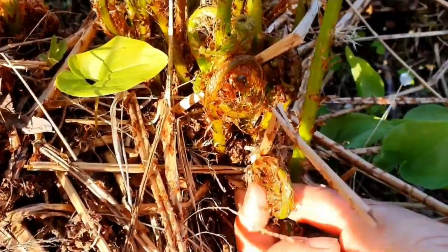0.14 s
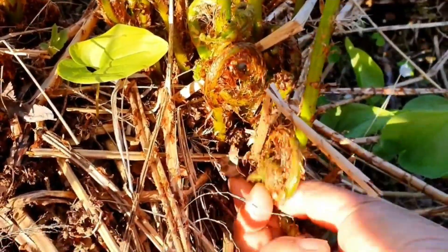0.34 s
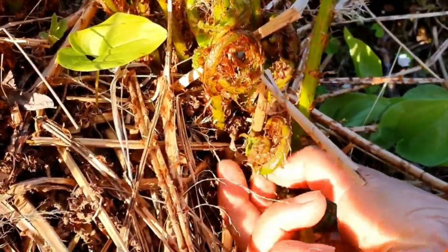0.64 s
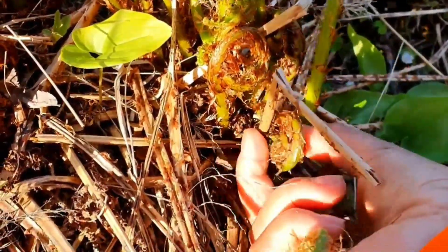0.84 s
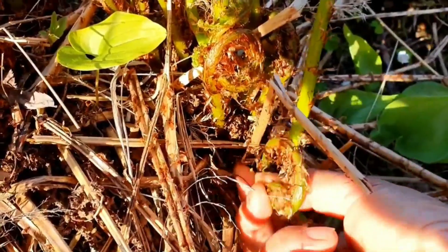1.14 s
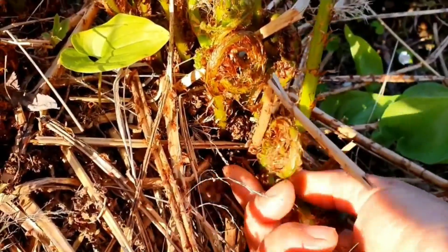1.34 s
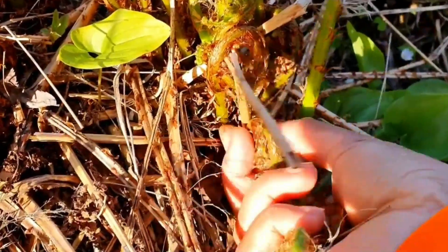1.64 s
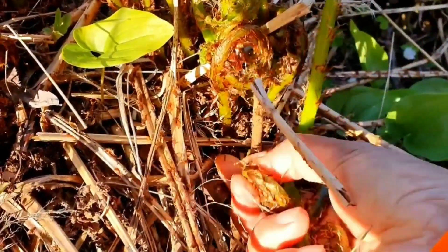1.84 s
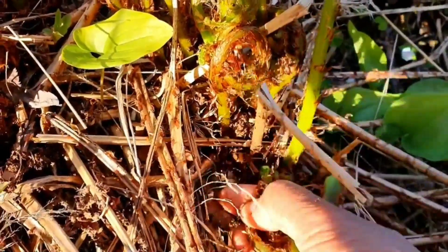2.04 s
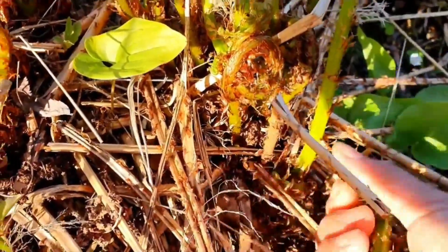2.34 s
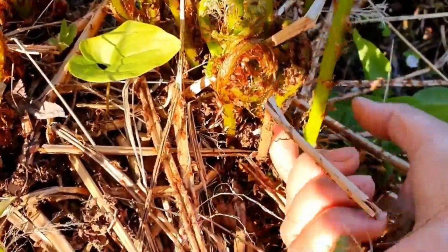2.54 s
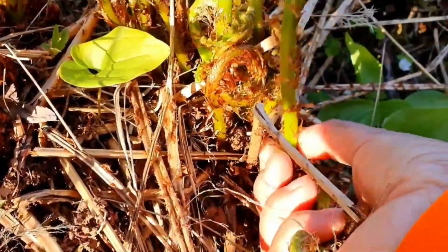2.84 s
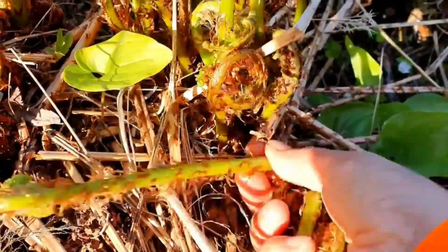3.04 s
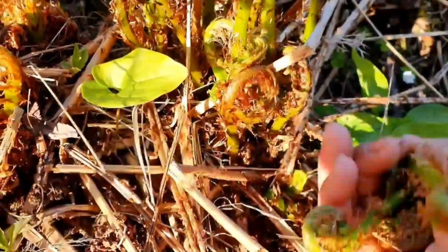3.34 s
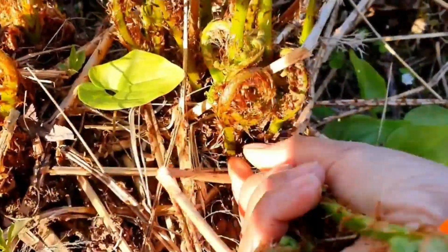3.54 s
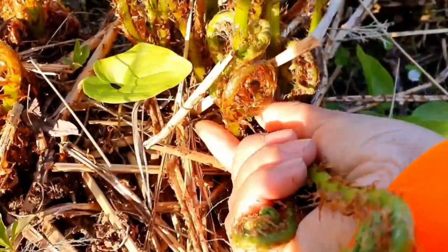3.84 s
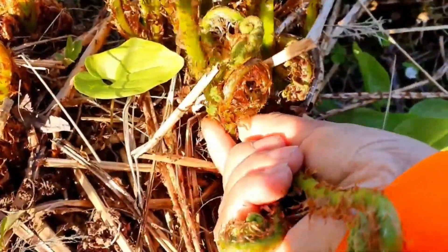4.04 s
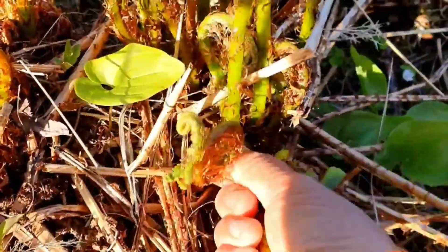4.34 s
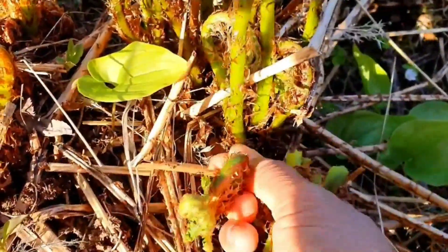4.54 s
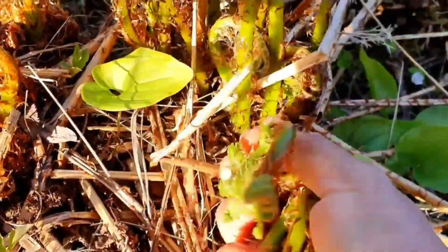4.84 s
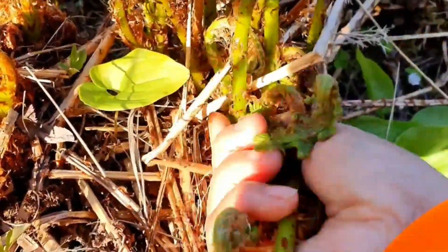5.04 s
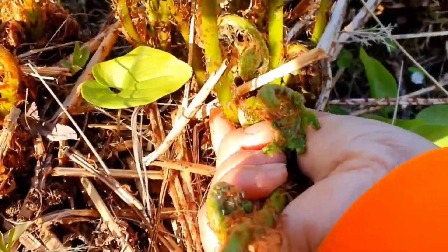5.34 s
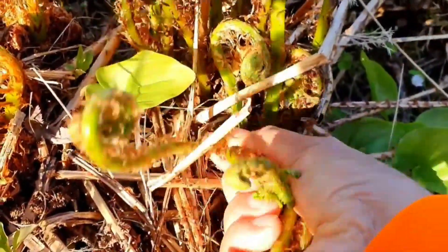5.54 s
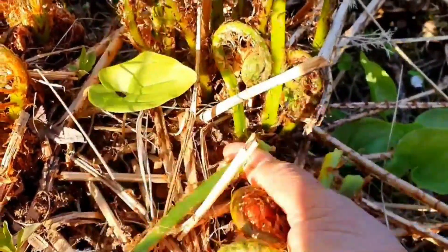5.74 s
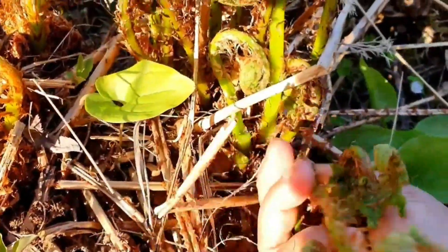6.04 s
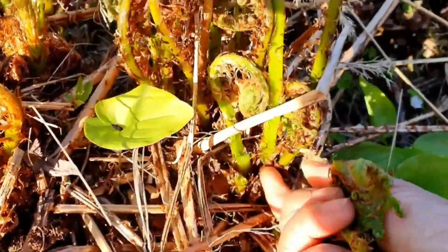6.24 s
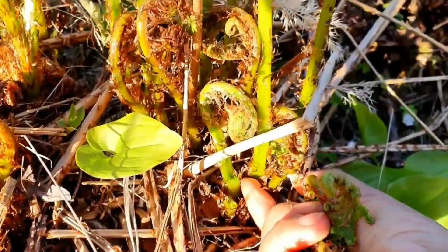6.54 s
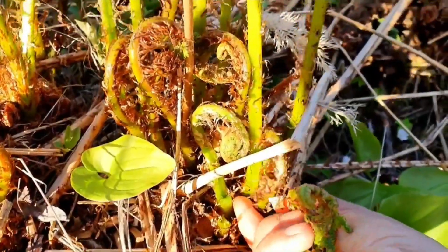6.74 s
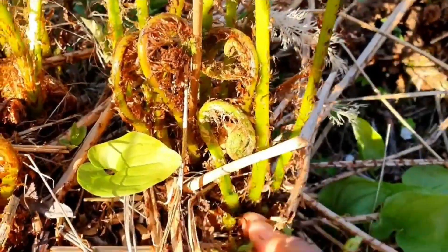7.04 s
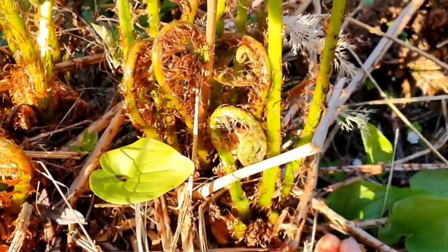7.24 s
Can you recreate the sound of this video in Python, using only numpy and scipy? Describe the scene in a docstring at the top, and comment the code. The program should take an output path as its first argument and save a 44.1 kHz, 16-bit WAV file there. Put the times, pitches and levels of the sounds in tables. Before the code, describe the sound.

Dry leaflets crackle and fizz in short irregular sweeps as a hand picks young ferns. Brittle stems tick and crack around five juicy snaps, each a sharp click with a short splintering tear. Small low bumps stir the root crown, one clearly stronger late on. The sound is close, dry and detailed, with almost no echo, above a faint distant engine and soft low air rumble.

```python
"""Dead fronds rustle and dry stalks crack from the start, as a hand works close to two microphones.
Then five juicy fern shoots snap off one by one: pulses and noise tails through knock, ring and splinter bands.
Bumps and each snap's recoil rock the root crown, a bank of dying sines; the hardest bump comes past 4.9 s.
Below it all a far two-harmonic engine hum first eases, then slowly picks up speed and steadies,
over quiet outdoor rumble made of filtered noise."""
import sys
import numpy as np
from scipy import signal
from scipy.fft import rfft, irfft, next_fast_len
from scipy.io import wavfile
from scipy.ndimage import uniform_filter1d, map_coordinates

SR = 44100
rng = np.random.default_rng(int(sys.argv[2]) if len(sys.argv) > 2 else 0)


def store_pcm(level_fs):
    """Save levels as 16-bit WAV."""
    pcm = np.round(np.clip(level_fs, -1, 1) * 32767).astype(np.int16)
    wavfile.write(sys.argv[1], SR, np.atleast_2d(pcm).T)


N = 326508

# juicy shoots breaking, levels ahead of the layer gain: [start_s, knock_db, ring_db, splinter_db,
# knock_hz, ring_hz, left_lag_ms, left_over_right_db]
SHOOT_SNAPS = [(2.2023, -25, -16, -23, 1820, 7000, 0.11, -2.5),
               (3.2946, -35.5, -22, -23, 1184, 4290, 0.16, -3),
               (4.687, -30, -24.5, -24, 1730, 3670, 0.096, -0.5),
               (5.89, -32.5, -25.5, -29.5, 1800, 2980, 0.117, 0.5),
               (7.178, -29.5, -23, -24.5, 2000, 3680, 0.12, -5.5)]
# dry stalks cracking, level ahead of the layer gain: [start_s, ring_db, thickness_0_to_1, ring_hz,
# left_over_right_db]
STALK_CRACKS = [(0.126, -42.5, 0.2, 4160, 0), (0.2701, -33, 0.08, 3640, -6.5),
                (0.3077, -33, 0.75, 3420, -1.5), (0.5008, -38.5, 0.6, 5430, -1),
                (0.614, -40.5, 0.4, 6370, -7), (0.6789, -30.5, 0.41, 6560, -6), (0.947, -35, 0.34, 4000, 4),
                (1.1343, -35.5, 0.62, 3920, -10), (1.8311, -36.5, 0.67, 3400, -1),
                (1.846, -26, 0.1, 7000, -1), (1.8624, -39, 0.4, 6200, -8), (1.8798, -34, 0, 6950, -3),
                (1.9286, -30.5, 0.6, 6120, -9), (1.9348, -31.5, 0.81, 2750, -4.5),
                (1.975, -26, 0.78, 4930, -6), (2.0522, -30, 0.4, 3640, -28), (2.0663, -35.5, .3, 3770, 12),
                (2.1267, -33, 0.56, 3760, -4), (2.2441, -31.5, .95, 3040, -0.5),
                (2.421, -39.5, 0.96, 6710, -1), (2.4459, -33, 0.82, 3750, -1.5),
                (2.8246, -41, 0.57, 4630, -18), (3.0775, -49, 0, 6900, -6), (3.319, -34, 0.1, 3100, -1),
                (3.3365, -38.5, 0.1, 3944, -3), (3.486, -35, 0.25, 3830, -2),
                (3.4904, -30.5, 0.43, 4760, -3.5), (4.0588, -39.5, 0.5, 5470, -5),
                (4.1793, -45, 0.2, 5250, 7), (4.2964, -37.5, 0.52, 4460, -3), (4.3805, -45, .05, 3570, 0),
                (4.4359, -43, .05, 5640, 2), (4.4569, -38, 0, 6900, 0), (4.5223, -34, 0.4, 6300, -2),
                (4.5727, -38, 0.35, 4260, -3), (4.8034, -28, 0.76, 3800, -1.5),
                (4.9549, -28, 0.23, 3650, 1.5), (4.9848, -28, 1, 6330, 0), (6.0942, -42, 0.78, 4100, 0),
                (6.2568, -41.5, .7, 4170, 2), (6.6003, -44.5, 0, 5060, -3), (6.7246, -47, 0.14, 4780, -4),
                (6.9566, -40.5, 0.36, 6270, -7), (7.1857, -35, 1, 3780, 2), (7.2168, -35, 0.99, 2830, 0)]
# the hand bumps the crown and soil: [start_s, strength_db over the crown modes, contact_cutoff_hz]
CROWN_BUMPS = [(0.679, -48.5, 119), (1.465, -48.5, 70), (1.976, -47, 900), (2.242, -43, 900),
               (2.448, -43, 500), (3.321, -48.5, 500), (4.985, -27, 130), (6.098, -41.5, 1295),
               (7.059, -48.5, 70), (7.217, -42.5, 600)]
# far engine, around which the pitch wavers: [time_s, firing_hz]
ENGINE_SPEED = [(0.0, 38.58), (0.65, 36.85), (2.43, 36.53), (3.0, 38.0), (3.42, 39.8), (4.12, 41.74),
                (5.26, 42.7), (5.5, 42.5), (6.11, 42.2), (7.05, 42.2)]
# relative spectra of stalk scrape, leaflet rustle, papery fizz and outdoor rumble: [freq_hz, level_db]
STALK_SPECTRUM = [(100, -16), (220, -6), (450, -9.5), (1000, -8.5), (1500, -2), (2000, -2), (2600, -4.5),
                  (4000, -28)]
FROND_SPECTRUM = [(1200, -57), (2100, -10), (2800, -0.5), (3800, 0.5), (5200, -2), (6700, -2), (8000, -11),
                  (11000, -39)]
PAPER_SPECTRUM = [(5000, -19), (7000, -10.5), (8200, -3), (9800, 0), (12500, -1), (15000, -0.5),
                  (15600, -5), (16000, -41)]
AIR_SPECTRUM = [(15, -24), (35, -7.5), (70, 7.5), (110, -3.5), (170, -11.5), (300, -21.5), (700, -36.5),
                (2000, -36), (15000, -40), (16500, -56)]
# how alike the two microphones hear the rustle: [freq_hz, likeness_0_to_1]
RUSTLE_LIKENESS = [(200, 0.4), (1000, 0.51), (2500, 0.11), (6000, 0.039), (15000, 0.12)]
# scatter dying away in the undergrowth: [freq_hz, t60_s]
LITTER_DECAY = [(200, 0.24), (2000, 0.024), (12000, 0.014)]
# the root crown rocking in the soil, and its woody stubs, before random scatter: [mode_hz, level_db, t60_s]
CROWN_MODES = [(74.7, -2, 0.18), (106.6, -5.5, 0.13), (153, -1, 0.076), (240, -9, 0.061),
               (340, -20.5, 0.023), (580, -1.5, 0.029), (720, 4, 0.016), (900, -7, 0.011),
               (1180, 10, 0.018), (1640, 3.5, 0.027)]
# light, unbroken touch of the dead fronds, ahead of the layer gains: [time_s, rustle_db]
LIGHT_CONTACT = [(0, -58.5), (.5, -54.5), (.84, -60.5), (1, -56.5), (1.45, -68), (1.74, -66.5),
                 (1.9, -51.5), (2.65, -55), (3.18, -64), (3.42, -59.5), (3.68, -61.5), (3.85, -53.5),
                 (4.22, -55), (5.3, -53.5), (5.7, -60.5), (6.15, -51), (6.82, -61.5), (7.4, -49)]
# fronds swept aside, ahead of the layer gains: [peak_s, length_s, rustle_db, scrape_over_rustle_db,
# fizz_over_rustle_db]
FROND_SWEEPS = [(0.143, 0.18, -53.5, -7.5, 1.5), (0.306, 0.028, -48.5, -4, -8), (0.394, .13, -48, -8, -2),
                (0.497, 0.065, -49.5, -9, -2), (0.543, 0.037, -52, 0, -1), (0.681, 0.062, -47, -8.5, -1),
                (0.899, 0.065, -48.5, -11, -2.5), (1.097, 0.083, -54, -7, -5), (1.255, 0.1, -58.5, -3, -8),
                (1.361, 0.36, -56, -10.5, 0.5), (1.479, 0.11, -52, -13, -3.5),
                (1.643, 0.067, -53, -11, -1.5), (1.847, 0.06, -39, -12, 3), (1.966, 0.12, -52, -1.5, 0.5),
                (2.07, 0.12, -53, -6, -1.5), (2.247, 0.12, -42, -5, -2.5), (2.344, .09, -43, -12, -2),
                (2.453, 0.058, -46.5, -5.5, 0.5), (2.619, 0.24, -49.5, -12.5, -2),
                (2.831, 0.092, -49, -11, -2.5), (2.942, 0.057, -51.5, -6.5, -3),
                (3.313, 0.067, -39.5, -7.5, -2), (3.498, 0.17, -49, -12, -2),
                (3.944, 0.085, -50, -12.5, -2.5), (4.063, 0.17, -50, -13, -5), (4.3, 0.042, -43.5, -8.5, 0),
                (4.353, 0.05, -42.5, -16.5, 0.5), (4.457, 0.032, -37.5, -13, -5),
                (4.511, 0.045, -41.5, -10, 3), (4.723, 0.16, -51, -8, -2),
                (4.862, 0.096, -45.5, -9.5, -2.5), (4.979, 0.12, -42, -10, -1),
                (5.417, 0.079, -46.5, -18, -3), (5.574, 0.073, -54, -12.5, -1), (5.935, 0.13, -42, -7, -2),
                (6.102, 0.077, -47.5, -5, -2), (6.28, .1, -51, -15.5, -5), (6.592, .1, -55, -16, -2),
                (7.066, 0.097, -52, -11.5, 0.5), (7.184, 0.085, -41, -7.5, 1)]

# a thick stalk knocks, a thin one splinters: dB over the ring at (thinnest, thickest)
KNOCK_OVER_RING_DB = (-23.5, -1)
SPLINTER_OVER_RING_DB = (1, -9)
STALK_KNOCK_HZ, STALK_KNOCK_SPREAD = 1900, 0.14  # centre of the bending tones, and their share of scatter
STALK_LAG_MS = 0.12  # the left microphone hears the stalks later
# part of a sweep's length spent rising, drop at its ends, shape of its peak (1 = pointed)
SWEEP_RISE_SHARE, SWEEP_EDGE_DB, SWEEP_ROUNDNESS = 0.43, 10, 1.22
CONTACT_SCRAPE_DB, CONTACT_FIZZ_DB = -15.5, -2.5  # over the rustle of light contact
DIP_S, DIP_DB = 0.011, -10  # the rustle dips briefly just before each snap
RECOIL_S, RECOIL_DB, RECOIL_HZ = 0.00392, -49, 650  # crown springing back: delay, strength, contact cut-off
# rms of the first harmonic at mean speed, its rise with speed, rms of the second harmonic
ENGINE_DB, ENGINE_DB_PER_HZ, SECOND_DB = -55, 0.9, -62
TOP_HZ = 16500  # upper band limit


def shoots():
    """Juicy stems snap: a clean parting pulse leads over a modest tear."""
    return fractures(SHOOT_SNAPS, tear=0.38, tear_t60=0.012, scatter_db=-2.0, scatter_t60=0.005,
                     strain_db=-13, knock_width=0.19, ring_width=0.26, narrow_share=0.43,
                     body_db=-17.5, splinter_hz=7000, gain_db=1.5)


def cracks():
    """Dry stalks crack: a stronger, shorter tear with more scatter around it."""
    return fractures(dry_stalks(), tear=0.85, tear_t60=0.0063, scatter_db=5.0, scatter_t60=0.015,
                     strain_db=-22, knock_width=0.16, ring_width=0.17, narrow_share=0.12,
                     body_db=-26, splinter_hz=6880, gain_db=0.4)


def dry_stalks():
    """Rows for fractures(): a stalk's thickness shares its energy between knock and splinters."""
    s, ring_db, thickness, ring_hz, pan_db = np.transpose(STALK_CRACKS)
    knock_db = ring_db + np.interp(thickness, [0, 1], KNOCK_OVER_RING_DB)
    splinter_db = ring_db + np.interp(thickness, [0, 1], SPLINTER_OVER_RING_DB)
    knock_hz = STALK_KNOCK_HZ * np.exp(STALK_KNOCK_SPREAD * rng.uniform(-1.1, 1, len(s)))
    lag_ms = np.full(len(s), STALK_LAG_MS)
    return np.transpose([s, knock_db, ring_db, splinter_db, knock_hz, ring_hz, lag_ms, pan_db])


def fractures(rows, tear, tear_t60, scatter_db, scatter_t60, strain_db, knock_width, ring_width,
              narrow_share, body_db, splinter_hz, gain_db):
    """A few fibres give way, the stem parts in one pulse, the rest tear; nearby stalks scatter the click."""
    out = np.zeros((2, N))
    lead = 128  # samples ahead of the parting
    t = (np.arange(2048) - lead) / SR
    core = slice(lead - 35, lead + 141)  # levels are rms over these 4 ms
    swell = (t < 0) * amp(-60 * np.abs(t) / 0.006)
    parting = t == 0

    def after(t60):
        """Decay that follows the parting."""
        return (t > 0) * amp(-60 * np.abs(t) / t60)

    def norm(x):
        """Scale to unit energy."""
        return x / np.linalg.norm(x)

    def resonate(x, hz, width):
        """Gentle band around one resonance."""
        return band(x, hz / (1 + width), hz * (1 + width), order=1)

    for s, knock_db, ring_db, splinter_db, knock_hz, ring_hz, lag_ms, pan_db in rows:
        torn, strain, left, right = rng.standard_normal((4, len(t)))
        tearing = tear * norm(torn ** 3 * after(tear_t60))  # cubing makes the noise spiky
        straining = amp(strain_db) * norm(strain * swell)
        force = parting + tearing + straining
        scatter = amp(scatter_db) * np.array([norm(side * after(scatter_t60)) for side in (left, right)])
        pair = force + scatter

        long_waves = force + 0.044 * scatter  # thin stalks scatter low tones less
        body = resonate(long_waves, 0.46 * knock_hz, 0.12)  # lower of two bending modes
        knock = resonate(long_waves, knock_hz, knock_width) + amp(body_db) * body
        # narrow shared band near 7 kHz, perhaps a microphone resonance; mixed in with flipped sign
        narrow = narrow_share * resonate(pair, 6970, 0.048)
        ring = band(resonate(pair, ring_hz, ring_width) - narrow + 0.22 * force, 1930, 9000)
        splinter = band(pair + 0.22 * parting, splinter_hz, 13200, order=3)  # extra treble from the parting

        click = 0
        for db, part in [(knock_db, knock), (ring_db, ring), (splinter_db, splinter)]:
            click = click + amp(db + gain_db) * part / np.sqrt(np.mean(part[:, core] ** 2))
        add(out, s - lead / SR, placed(click, lag_ms, pan_db))
    return out


def rustle():
    """Dead fronds catch and slide on the skin: stalks scrape, leaflets crackle and tick, thin edges fizz."""
    rustle_db, scrape_db, fizz_db = handling()
    catching_db = 0.59 * wobble(30) + 1.17 * wobble(140)
    stalks = crackle(STALK_SPECTRUM, rate=600, spread_db=4, rub=0.8, patchy_db=4, lag_ms=0.12, pan_db=-1.0)
    fronds = crackle(FROND_SPECTRUM, rate=800, spread_db=4, rub=1.55, patchy_db=2, lag_ms=0.14, pan_db=-1.5)
    paper = crackle(PAPER_SPECTRUM, rate=700, spread_db=3.5, rub=1.04, patchy_db=2.5,
                    lag_ms=0.138, pan_db=-1.6)
    ticks = amp(-7.5) * twigs(rate=60, spread_db=16, t60=0.0083)
    ticks = ticks + amp(-8) * fibres(rate=130, spread_db=19, lo_hz=2900, hi_hz=12400)
    scrape = amp(scrape_db) * stalks
    leaflets = amp(rustle_db) * (amp(0.52) * fronds + ticks)
    fizz = amp(fizz_db) * amp(1.0) * paper
    return amp(catching_db) * (scrape + leaflets + fizz)


def handling():
    """Levels in dB of leaflets, stalks and thin edges: sweeps swell and fade on top of the light contact."""
    t = np.arange(0, N, 64) / SR

    def layers(db, scrape_db, fizz_db):
        """Power of the three layers."""
        return amp(db + np.array([[0], [scrape_db], [fizz_db]])) ** 2

    contact_db = np.interp(t, *np.transpose(LIGHT_CONTACT))
    power = layers(contact_db, CONTACT_SCRAPE_DB, CONTACT_FIZZ_DB)
    for s, length, db, scrape_db, fizz_db in FROND_SWEEPS:
        # 0 at the peak, 1 at either end of the sweep
        away = np.maximum((s - t) / SWEEP_RISE_SHARE, (t - s) / (1 - SWEEP_RISE_SHARE)) / length
        power = power + layers(db - SWEEP_EDGE_DB * away ** SWEEP_ROUNDNESS, scrape_db, fizz_db)
    dips = sum((t < snap[0]) * np.exp(-np.abs(t - snap[0]) / DIP_S) for snap in SHOOT_SNAPS)
    levels_db = 10 * np.log10(power) + DIP_DB * dips
    return curves(np.transpose([t, *levels_db]))


def crackle(spectrum, rate, spread_db, rub, patchy_db, lag_ms, pan_db):
    """Tiny slips of random size over a smooth rub, heard differently by the two microphones; rms 1."""
    size_db = spread_db * np.minimum(rng.standard_exponential(N), 3)
    slips = (rng.random(N) < rate / SR) * amp(size_db)
    # each slip dies within a millisecond or two
    power = signal.lfilter([1], [1, -np.exp(-1 / (0.0014 * SR))], slips ** 2)
    envelope = np.sqrt(power / power.mean() + rub)
    pair = patchy(rng.standard_normal((2, N)), patchy_db) * envelope

    def mid_side(hz):
        """Spectrum shared between middle and side to give the wanted likeness."""
        turn = np.arccos(np.clip(along(RUSTLE_LIKENESS, hz), -1, 1)) / 2
        return amp(along(spectrum, hz)) * np.array([np.cos(turn), np.sin(turn)])

    mid, side = filtered(pair, mid_side)
    return unit(placed(np.array([mid + side, mid - side]), lag_ms, pan_db))


def patchy(x, depth_db):
    """Each leaflet that is touched lends its own colour for a few hundredths of a second."""
    z = signal.stft(x, nperseg=512)[2]
    field = uniform_filter1d(rng.standard_normal(z.shape[1:]), size=7, axis=0)  # smooth over frequency
    field = uniform_filter1d(field, size=5, axis=1)  # smooth over time
    return signal.istft(z * amp(depth_db * unit(field)), nperseg=512)[1][:, :N]


def twigs(rate, spread_db, t60):
    """Thin dry stalks tick at random, each a short noise burst at its own pitch; rms 1."""
    out = np.zeros((2, N))
    t = np.arange(SR // 50) / SR
    for when, size, pitch in rng.random((int(rate * N / SR), 3)):
        hz = 2800 * 3.5 ** pitch
        burst = rng.standard_normal(len(t)) + 0.96 * rng.standard_normal((2, len(t)))
        tick = unit(band(burst * amp(-60 * t / t60), hz / 1.44, hz * 1.6))
        add(out, when * N / SR, amp(spread_db * size ** 2) * tick)
    return unit(placed(out, lag_ms=0.15, pan_db=-1.5))


def fibres(rate, spread_db, lo_hz, hi_hz):
    """Single dry fibres part at random, each in one sharp pulse; rms 1."""
    sizes = amp(spread_db * rng.random(N) ** 2)
    pulses = (rng.random(N) < rate / SR) * rng.choice([-1, 1], N) * sizes
    pair = pulses * amp(2 * rng.standard_normal((2, N)))
    return unit(placed(band(pair, lo_hz, hi_hz), lag_ms=0.13, pan_db=-4.5))


def bumps():
    """Bumped or released by a snap, the crown rocks briefly; a soft contact barely stirs its high modes."""
    out = np.zeros(N)
    t = np.arange(SR // 4) / SR
    hz, mode_db, t60 = np.transpose(CROWN_MODES)[:, :, None]
    recoils = [(snap[0] + RECOIL_S, RECOIL_DB, RECOIL_HZ) for snap in SHOOT_SNAPS]
    for s, db, contact_hz in list(CROWN_BUMPS) + recoils:
        detune, strength_db = rng.standard_normal((2, len(CROWN_MODES), 1))
        decay = amp(mode_db + strength_db - 60 * t / t60)
        modes = np.sin(2 * np.pi * hz * (1 + 0.05 * detune) * t) * decay
        softened = modes / np.hypot(1, hz / contact_hz)
        add(out, s, amp(db) * np.sum(softened, axis=0))
    return out


def undergrowth(x):
    """A short diffuse answer from the ground and plants: noise decaying at its own rate in each band."""
    hz, t, z = signal.stft(rng.standard_normal((2, SR // 6)), SR, nperseg=128)
    decay = amp(-60 * t / along(LITTER_DECAY, hz)[:, None])
    tail = signal.istft(z * decay, SR, nperseg=128)[1]
    return signal.fftconvolve(x, tail / np.linalg.norm(tail[0]), axes=1)[:, :N]


def engine():
    """Only the lowest two firing harmonics carry this far; the first grows with speed."""
    firing_hz, = curves(ENGINE_SPEED)
    phase = 2 * np.pi * np.cumsum(firing_hz * (1 + 0.004 * wobble(5))) / SR
    speed_db = ENGINE_DB_PER_HZ * (firing_hz - firing_hz.mean())
    first = amp(ENGINE_DB + speed_db + 1.4 * wobble(3.88)) * np.sin(phase)
    second = amp(SECOND_DB + 0.88 * wobble(4.0)) * np.sin(2 * phase)
    return np.sqrt(2) * (first + second)  # turns the rms levels into peaks


def air():
    """Quiet outdoor rumble: filtered noise, largely shared by both microphones."""
    pair = rng.standard_normal(N) + 0.59 * rng.standard_normal((2, N))
    return amp(-62.5) * unit(filtered(pair, lambda hz: amp(along(AIR_SPECTRUM, hz))))


def amp(db):
    """Decibels to gain."""
    return 10 ** (np.asarray(db) / 20)


def unit(x):
    """Scale to rms 1."""
    return x / np.sqrt(np.mean(x ** 2) + 1e-20)


def along(points, hz):
    """(Hz, value) points read on a log frequency axis."""
    f, v = np.transpose(points)
    return np.interp(np.log(hz + 1), np.log(f + 1), v)


def curves(rows):
    """One value per sample for each column after the time."""
    s, *cols = np.transpose(rows)
    return [np.interp(np.arange(N) / SR, s, c) for c in cols]


def wobble(rate):
    """A smooth random curve, rate knots a second."""
    knots = rng.standard_normal(int(N * rate / SR) + 4)
    return map_coordinates(knots, [np.arange(N) * rate / SR])


def filtered(x, response):
    """x shaped by a response, real or complex, given as a function of frequency."""
    n = x.shape[-1]
    m = next_fast_len(n + 4096)
    return irfft(rfft(x, m) * response(np.fft.rfftfreq(m, 1 / SR)), m)[..., :n]


def band(x, lo_hz, hi_hz, order=2):
    """Causal band-pass."""
    sos = signal.butter(order, [lo_hz, min(hi_hz, SR / 2 - 1)], "band", fs=SR, output="sos")
    return signal.sosfilt(sos, x)


def placed(pair, lag_ms, pan_db):
    """Place a source: the left microphone hears it lag_ms later and pan_db louder than the right."""
    sides = np.array([[0.5], [-0.5]])  # left, right
    gains = unit(amp(sides * pan_db))
    return filtered(pair, lambda hz: gains * np.exp(-2j * np.pi * hz * sides * lag_ms / 1000))


def add(track, s, sound):
    """Mix a sound in at time s."""
    i = max(round(s * SR), 0)
    track[..., i:i + sound.shape[-1]] += sound[..., :N - i]


def scene():
    """Snaps, cracks and rustle close by, over the far hum."""
    breaks = shoots() + cracks()
    return breaks + amp(-19.0) * undergrowth(breaks) + rustle() + bumps() + engine() + air()


def record(dry):
    """The microphone chain sheds the deepest rumble, rounds the tallest peaks and cuts steeply at TOP_HZ."""
    thinned = signal.sosfilt(signal.butter(3, 30, "high", fs=SR, output="sos"), dry)
    rounded = thinned / (1 + np.abs(thinned / 0.9) ** 6) ** (1 / 6)
    return filtered(rounded, lambda hz: 1 / (1 + (hz / TOP_HZ) ** 120))


dry = scene()
out = record(dry)
store_pcm(out)
```